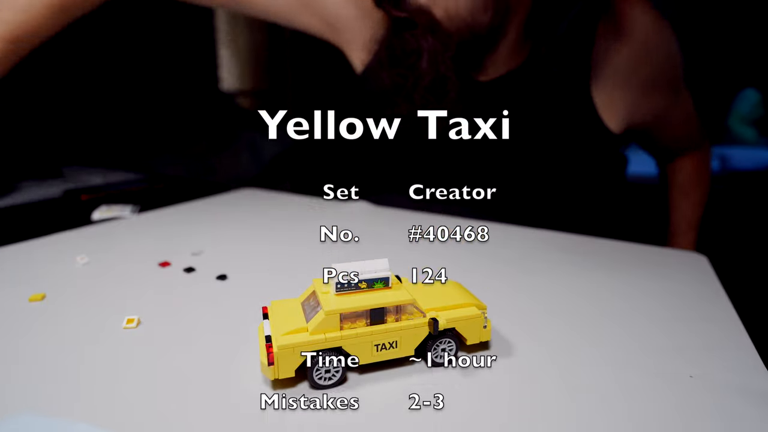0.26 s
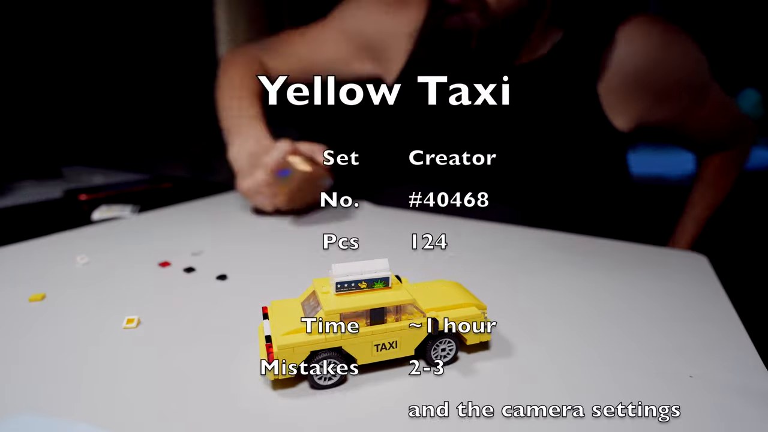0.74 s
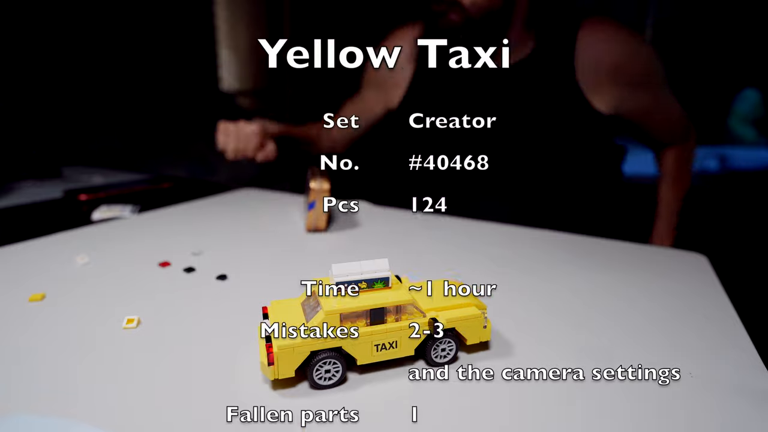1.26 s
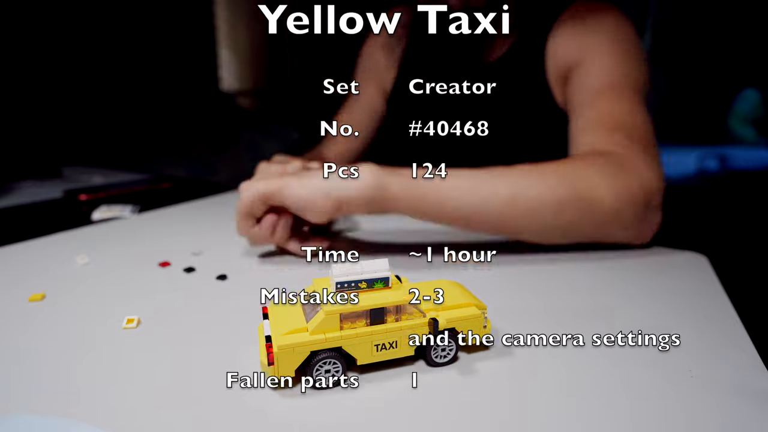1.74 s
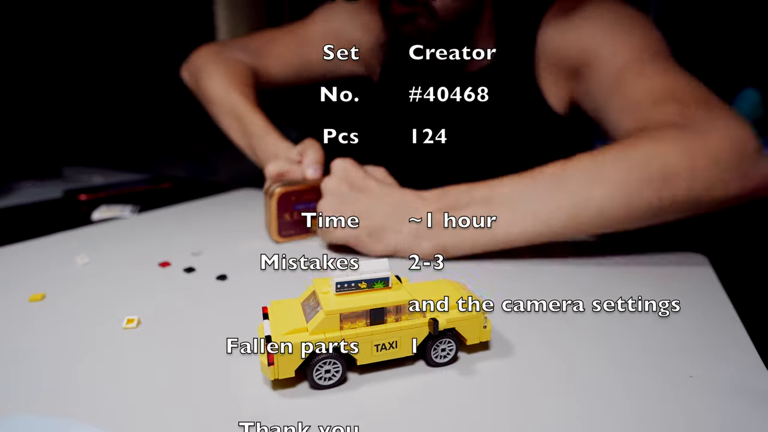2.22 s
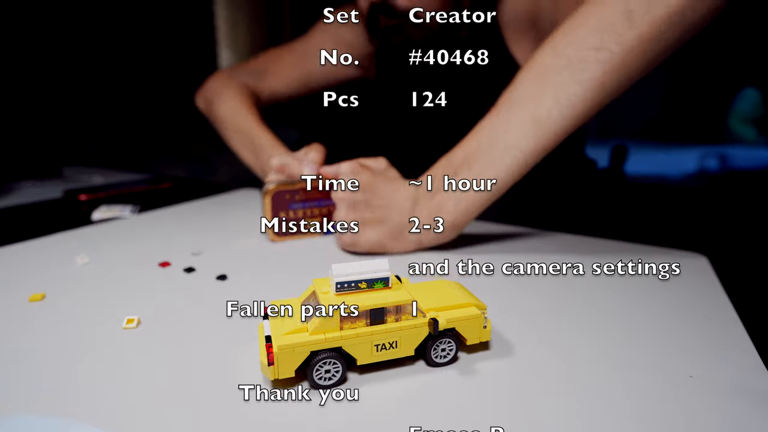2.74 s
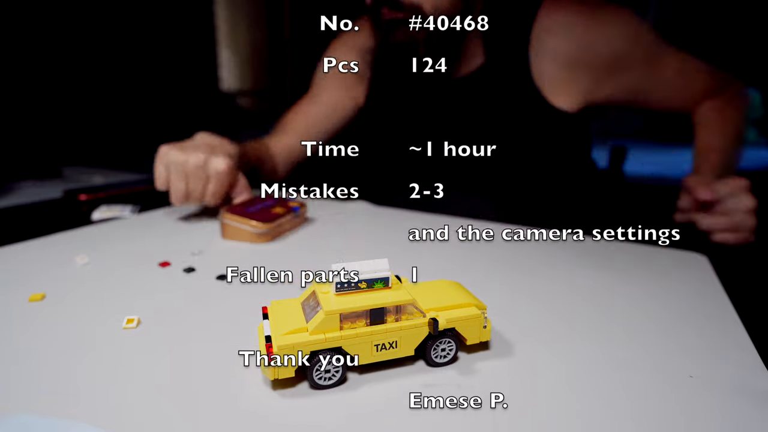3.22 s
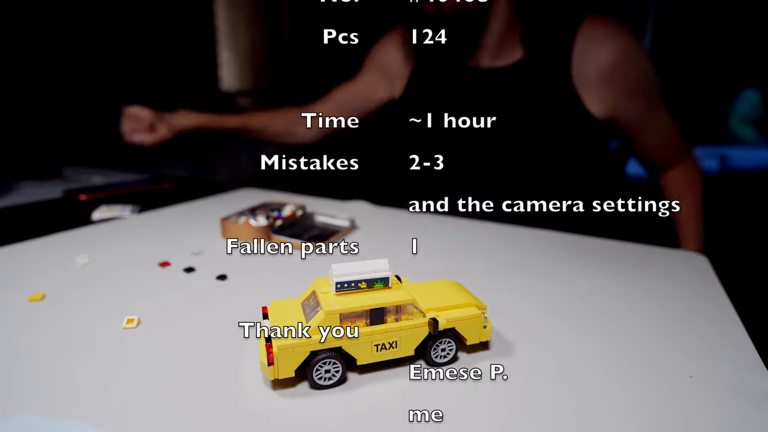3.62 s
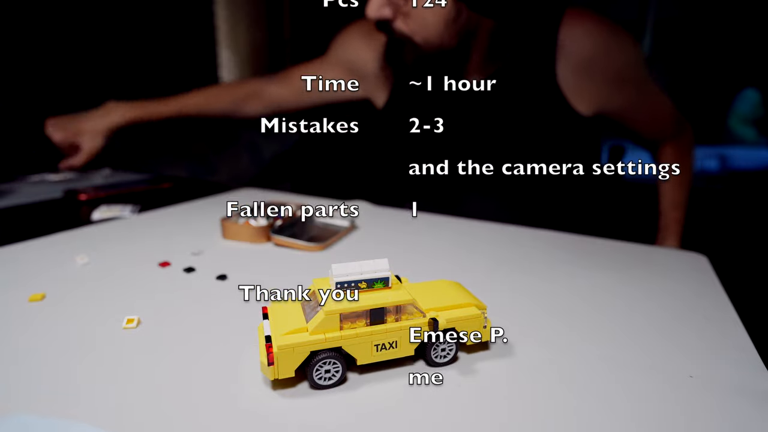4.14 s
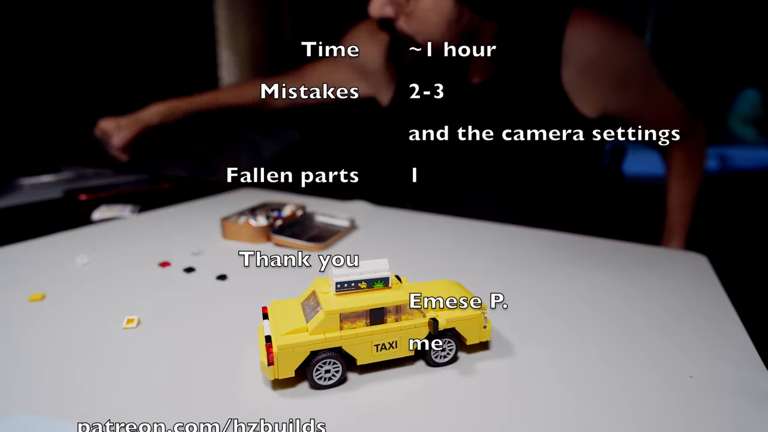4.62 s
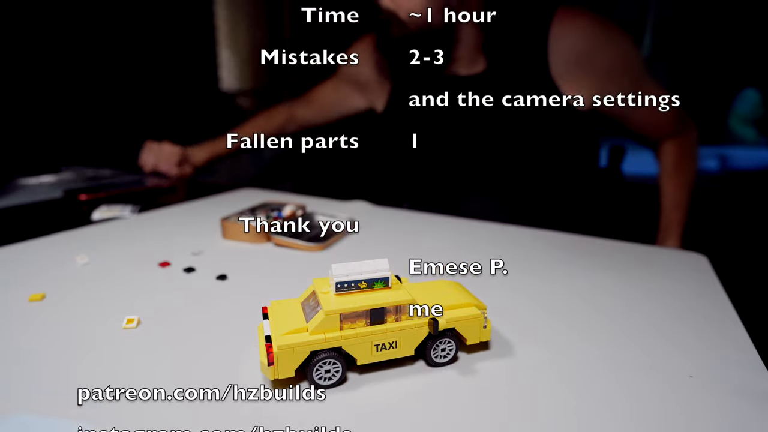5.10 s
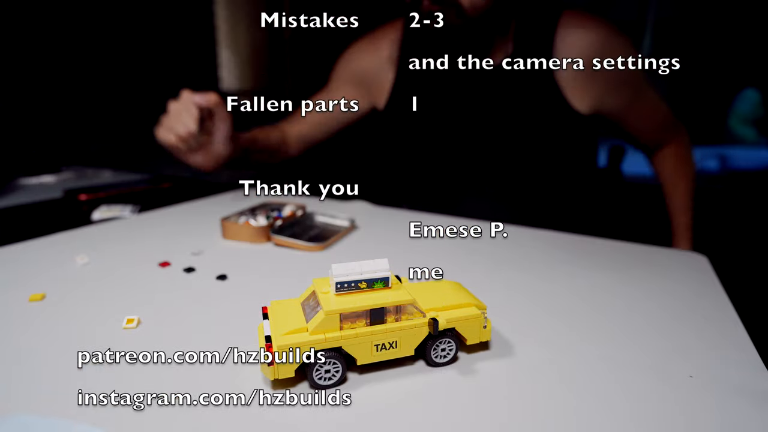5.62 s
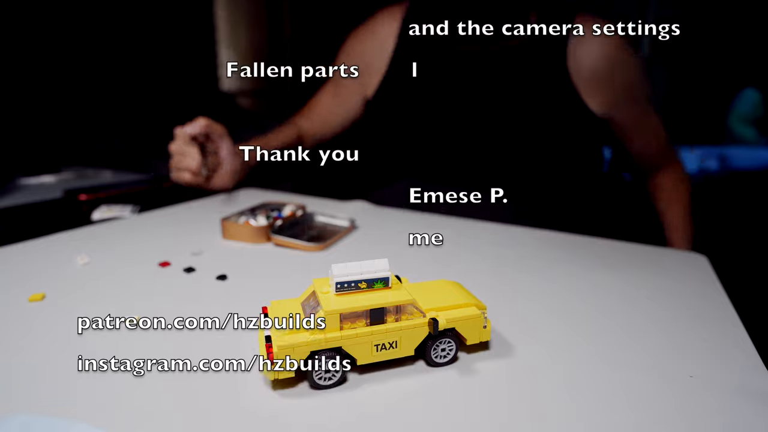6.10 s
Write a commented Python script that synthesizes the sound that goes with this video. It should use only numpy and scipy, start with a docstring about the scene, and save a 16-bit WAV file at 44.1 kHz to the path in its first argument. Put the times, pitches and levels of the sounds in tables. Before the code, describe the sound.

A small case filled with loose plastic bits drags raspingly over a table, clicking and rattling, then is stood on edge. After a quieter stretch of fumbling it snaps open sharply and clatters flat. Steel tools then knock dully and clink on the desk, with tweezers picked up last. Sleeves and arms rustle faintly, and the table shudders low after shoves. Close microphone in a quiet, dry room.

```python
"""A rasping drag over a table comes first: a small hinged case full of bits slides, is stood on edge, snapped open
and laid flat with a clatter. Steel tools and tweezers clink and knock on a desk beside it, and arms rustle by.
Friction is shaped noise under stroke envelopes; blows are noise bursts and pushes through resonances, some with
ringing sines. The table shudders at a low pitch after each shove, in a quiet, dry room."""
import sys
import numpy as np
from scipy import signal
from scipy.fft import rfft, irfft, next_fast_len
from scipy.io import wavfile
from scipy.ndimage import uniform_filter1d, map_coordinates

SR = 44100
rng = np.random.default_rng(int(sys.argv[2]) if len(sys.argv) > 2 else 0)


def materialize(psi):
    """Save the field psi as 16-bit PCM at rate SR to the path in sys.argv[1].

    A 1-D psi becomes a single channel; in a 2-D psi each row is a channel.
    """
    bounded = np.clip(np.atleast_2d(psi).T, -1, 1)
    quanta = np.round(bounded * 32767).astype(np.int16)
    wavfile.write(sys.argv[1], SR, quanta)


N = 280463

LEAD = SR // 14  # samples kept ahead of a contact
T = (np.arange(SR // 3) - LEAD) / SR  # time around a contact (s)
AFTER = np.maximum(T, 0)  # time since the contact (s)
TIME = np.arange(N) / SR  # time in the scene (s)

# tone of the loose bits inside the case: pitch_hz [Hz], gain_db [dB]
CONTENTS = [(50, -7), (130, -6.5), (280, 4.5), (520, -3), (700, 3), (1300, 1), (1900, -0.5), (3500, 0),
            (5000, -4), (8500, -12), (10500, -22), (13000, -21.5), (16000, -43)]


def amp(db):
    """Decibels to gain."""
    return 10 ** (np.asarray(db) / 20)


def unit(x):
    """Scale to rms 1."""
    return x / np.sqrt(np.mean(x ** 2) + 1e-20)


def crest(x, size=220):
    """Scale so that the loudest stretch of the given size in samples (5 ms by default) has rms 1."""
    return x / np.sqrt(uniform_filter1d(x ** 2, size).max() + 1e-20)


def fade(t, t60):
    """Exponential decay by 60 dB in t60 seconds."""
    return np.exp(-np.log(1000) * t / np.maximum(t60, 1e-4))


def swell(start, length, rise, t60):
    """Attack, hold and release over the whole scene; rise and t60 are the seconds per 60 dB."""
    attack = fade(np.maximum(start - TIME, 0), rise)
    release = fade(np.maximum(TIME - start - length, 0), t60)
    return attack * release


def along(points, hz):
    """Read (Hz, value) points on a log frequency axis."""
    f, v = np.transpose(points)
    return np.interp(np.log(hz + 1), np.log(f + 1), v)


def wobble(rate):
    """A random curve of straight segments, rate knots a second."""
    knots = rng.standard_normal(int(N * rate / SR) + 4)
    return map_coordinates(knots, [np.arange(N) * rate / SR], order=1)


def colour(x, gain):
    """Minimum-phase filter with the given gain over frequency, so nothing sounds ahead of its cause."""
    m = 2 * next_fast_len(len(x) // 2 + 4096)
    log_gain = np.log(np.maximum(gain(np.fft.rfftfreq(m, 1 / SR)), 1e-6))
    cepstrum = irfft(log_gain)
    # folding the cepstrum forward makes the filter causal
    cepstrum[1:m // 2] *= 2
    cepstrum[m // 2 + 1:] = 0
    return irfft(rfft(x, m) * np.exp(rfft(cepstrum)))[:len(x)]


def shaped(x, spectrum):
    """Filter x along (Hz, dB) points, at rms 1."""
    return unit(colour(x, lambda hz: amp(along(spectrum, hz))))


def peak(hz, centre, width):
    """Gain of one resonance."""
    return hz * width / np.hypot(centre ** 2 - hz ** 2, hz * width)


def grains(n, spread_db):
    """Countless tiny contacts of very unequal size."""
    size, sign = rng.standard_normal((2, n))
    return unit(sign * amp(spread_db * np.clip(size, -2, 2)))


def patchy(x, depth_db):
    """Resonances come and go as the point of contact moves: a smoothed random gain over pitch and time."""
    z = signal.stft(x, nperseg=1024)[2]
    field = uniform_filter1d(rng.standard_normal(z.shape), size=5, axis=0)
    field = uniform_filter1d(field, size=9, axis=1)
    return unit(signal.istft(z * amp(depth_db * unit(field)), nperseg=1024)[1][:N])


def chatter(rise, t60, spread_db):
    """Tiny contacts that crowd together towards a blow and die away after it."""
    return grains(len(T), spread_db) * fade(AFTER - T, rise) * fade(AFTER, t60)


def ring(modes, damping, scatter_db, blur_hz):
    """Free ringing at new mode strengths for each blow; loose contact makes the phases drift."""
    hz, db, t60 = np.transpose(modes)[:, :, None]
    strength, phase = rng.standard_normal((2, len(modes), 1))
    steps = rng.standard_normal((len(modes), len(T)))
    drift = np.cumsum(steps, axis=1) * np.sqrt(2 * np.pi * blur_hz / SR)
    level = amp(db + scatter_db * strength) * fade(AFTER * damping, t60)
    partials = level * np.sin(2 * np.pi * (hz * T + phase) + drift)
    return crest(partials.sum(axis=0) * (T >= 0))


def add(track, s, sound):
    """Mix in a sound whose contact falls at s seconds."""
    start = round(s * SR) - LEAD
    part = sound[max(-start, 0):N - start]
    track[max(start, 0):][:len(part)] += part


def background():
    """Still room air and the faint rustle of arms, which swells and fades with each sweep."""
    # room air spectrum: pitch_hz [Hz], relative_level_db [dB per Hz]
    air_spectrum = [(18, -20.5), (30, 5), (81, 0), (117, 2.5), (264, 0), (755, -11.5), (955, -26),
                    (1750, -16), (2800, -21.5), (4980, -24), (7780, -26), (14600, -33), (15800, -38.5)]
    # sweeps of the arms: middle_s [s], length_s [s, between the points 4.3 dB down], rustle_db [dB]
    arm_sweeps = [(0.147, 0.23, -58.5), (1.26, 0.27, -56), (1.52, 0.22, -57.5), (1.985, 0.51, -52.5),
                  (2.596, .4, -59.5), (3.4, 0.95, -59.5), (4.537, 0.21, -59), (5.712, 1, -62),
                  (6.08, 0.47, -61)]
    air = amp(-59.5) * shaped(grains(N, spread_db=7.5), air_spectrum)
    cloth = shaped(grains(N, spread_db=7), [
        (100, -16), (400, 0), (1500, -3.5), (4000, -10.5), (8500, -17.5), (10500, -24.5), (16000, -31.5)])
    power = sum(amp(db) ** 2 * np.exp(-(2 * (TIME - s) / length) ** 2) for s, length, db in arm_sweeps)
    return air + np.sqrt(power) * amp(0.5 * wobble(13)) * cloth


def sway(sway_hz=27.0, rumble_db=-6):
    """After each shove the table rocks on its legs: a deep drifting sine over rumble, dying away."""
    # shoves that set the table rocking: start_s [s], sway_db [dB]
    shoves = [(.03, -43.5), (.3, -47), (.87, -36), (1.81, -39.5), (2.035, -32), (2.27, -42), (2.72, -47),
              (2.89, -34), (3.05, -38), (3.44, -41), (3.86, -33.5), (4.23, -39.5), (4.44, -35.5),
              (4.79, -29), (5.11, -36), (5.34, -49), (5.79, -42), (6.13, -55)]
    rise_s, t60_s = 0.15, 0.47  # time the sway takes to gain and to lose 60 dB
    swing = unit(np.sin(2 * np.pi * sway_hz * TIME + 0.96 * wobble(10)))
    rumble = shaped(grains(N, spread_db=5.0), [
        (8, -19), (25, -0.5), (45, -3), (70, -22.5), (110, -12.5), (200, -36), (600, -92)])
    rocking = np.sqrt(sum((amp(db) * swell(s, 0, rise_s, t60_s)) ** 2 for s, db in shoves))
    return rocking * unit(swing + amp(rumble_db) * rumble)


def ticks():
    """Small bits tick against each other: each light touch is answered by one short resonance."""
    # ticks: contact_s [s], level_db [dB, loudest 5 ms], pitch_hz [Hz]
    touches = [(.664, -35.5, 1820), (1.139, -49, 755), (2.512, -26, 710), (2.861, -45.5, 7900),
               (3.147, -47, 1080), (3.708, -48.5, 1860), (3.801, -26.5, 3440), (4.065, -43.5, 1870),
               (4.071, -54, 4000), (5.337, -52, 2160), (5.411, -45, 4960)]
    out = np.zeros(N)
    for s, db, pitch_hz in touches:
        touch = chatter(rise=0.022, t60=0.017, spread_db=1.5)
        tick = colour(touch, lambda hz: peak(hz, pitch_hz, 0.17 * pitch_hz) ** 2)
        add(out, s, amp(db) * crest(tick))
    return out


def steel(touches, modes, grip_hz, scratch_db, damping):
    """Steel chatters against the desk, its modes widened by the fingers' damping, and rings on."""
    out = np.zeros(N)

    def held(hz):
        widths = [grip_hz * (centre / 5000) ** 0.16 for centre, _, _ in modes]
        resonances = sum(amp(level) * peak(hz, centre, width) ** 2
                         for (centre, level, _), width in zip(modes, widths))
        return resonances + amp(scratch_db)

    for s, db, rise, t60, ring_db, treble_db in touches:
        clink = crest(colour(chatter(rise, t60, spread_db=15.5), held))
        clink += amp(ring_db) * ring(modes, damping=damping, scatter_db=4.5, blur_hz=39.3)
        tilted = colour(clink, lambda hz: amp(along([(1500, 0.0093), (12000, treble_db)], hz)))
        add(out, s, amp(db) * crest(tilted))
    return out


def tweezers():
    """Tweezers are picked up: thin steel chatter and ring with high modes."""
    # touches: contact_s [s], level_db [dB, loudest 5 ms], rise_s [s per 60 dB], chatter_t60_s [s],
    # ring_db [dB re chatter], treble_db [dB at 12 kHz]
    touches = [(5.338, -35.5, 0.033, 0.037, -7, -12.5), (5.410, -52, .004, 0.016, -14, 0),
               (5.547, -54, 0.041, 0.13, -15, -7)]
    # modes of the tweezers: pitch_hz [Hz], mean_level_db [dB], free_t60_s [s, before damping divides it]
    modes = [(1190, -4, 0.19), (2325, -10, .12), (5050, -1.5, 0.16), (6360, -7, 0.12), (7840, 5, 0.15),
             (8500, -3, 0.15), (9600, -21, 0.1), (11100, -7, 0.07), (11600, 2, 0.22), (13700, -1, .08),
             (15000, 2, .035)]
    return steel(touches, modes, grip_hz=330, scratch_db=-15, damping=1.6)


def tools():
    """Steel tools touch as they are put down: heavier steel chatters and rings from lower modes up."""
    # touches: contact_s [s], level_db [dB, loudest 5 ms], rise_s [s per 60 dB], chatter_t60_s [s],
    # ring_db [dB re chatter], treble_db [dB at 12 kHz]
    touches = [(3.802, -30, 0.024, 0.062, -29, 7), (3.909, -33, 0.037, 0.03, -2, 0),
               (3.970, -40.5, 0.12, 0.071, -32, -7.5), (4.125, -42, 0.053, 0.1, 8, -26),
               (4.186, -28.5, 0.0015, 0.003, -19, -23.5), (4.405, -57, 0.033, 0.15, 7, -15)]
    # modes of the tools: pitch_hz [Hz], mean_level_db [dB], free_t60_s [s, before damping divides it]
    modes = [(780, 6, 0.061), (1440, 3.5, 0.14), (2750, 1.5, 0.24), (3370, 1, 0.055), (4110, -1.5, .2),
             (4680, 0.5, .2), (5100, -4.5, 0.35), (5300, -7, 0.2), (5980, -9, 0.38), (6420, -2, 0.17),
             (7100, 1.5, 0.076), (7860, -2, 0.11), (8530, 1.5, 0.091), (9700, -9, 0.11),
             (10400, -20, 0.083), (12100, -22, .12)]
    return steel(touches, modes, grip_hz=210, scratch_db=-18, damping=1.13)


def knocks(approach_cycles=12):
    """Hands, case and tools bump the desk; a softer contact builds up longer and wakes fewer resonances."""
    # dull knocks: contact_s [s], level_db [dB, loudest 5 ms], softness_hz [Hz], chatter_t60_s [s], thump_db [dB]
    blows = [(.195, -35, 690, .13, -20), (.219, -31.5, 720, 0.05, -22), (.796, -38, 298, .13, -2),
             (.828, -21.5, 1300, 0.02, 7), (.842, -32.5, 248, 0.1, 4), (.983, -46, 266, 0.64, 5),
             (1.782, -35, 347, 0.033, -3.5), (1.995, -37.5, 253, 0.11, -22), (2.051, -40, 247, 0.063, 0),
             (2.252, -40, 210, 0.073, -11), (3.796, -23.5, 714, 0.093, -2), (3.803, -25, 760, 0.04, -22),
             (3.827, -23, 950, 0.21, -16), (3.839, -21, 456, 0.094, -29), (3.853, -20.5, 930, .14, -12),
             (4.125, -45.5, 500, 0.38, -3), (4.17, -30, 1470, 0.22, -20), (4.186, -19.5, 1640, 0.16, -27),
             (4.204, -18.5, 844, 0.076, -23), (4.215, -19.5, 1410, 0.1, -8), (4.4, -34, 354, 0.057, -10),
             (4.447, -28, 436, .046, -21), (4.456, -20, 402, 0.062, -30), (4.747, -26, 403, 0.096, -0.5),
             (4.757, -24.5, 373, 0.1, 0), (4.818, -45.5, 684, 0.18, -12), (4.992, -48.5, 257, 0.16, 4),
             (5.079, -36.5, 374, 0.19, 9), (5.149, -39.5, 710, 0.094, -18), (5.203, -33.5, 360, .026, -18),
             (5.337, -32.5, 300, 0.17, 4.5), (5.763, -39.5, 1060, 0.12, -2)]
    # desk resonances: pitch_hz [Hz], width_hz [Hz], level_db [dB]
    desk_modes = [(241, 230, -9), (324.6, 55, -0.5), (430, 160, -1.5), (736, 83, 1.5), (1020, 660, -3.5),
                  (1300, 34, -7), (1524, 31, 0), (1784, 63, 3), (2230, 780, -5)]
    out = np.zeros(N)

    def desk(hz):
        return np.sqrt(sum((amp(level) * peak(hz, centre, width)) ** 2 for centre, width, level in desk_modes))

    def spring(hz, soft_hz):
        # the contact is a spring: it favours its own frequency and muffles all above it
        muffling = 1 / np.hypot(1, (hz / soft_hz) ** 2.83)
        return muffling + 0.47 * peak(hz, soft_hz, 0.14 * soft_hz) ** 2 + amp(-42)

    for s, db, soft_hz, t60, thump_db in blows:
        rise_s = 0.0036 + approach_cycles / soft_hz
        blow = (T == 0) + 0.11 * chatter(rise=rise_s, t60=t60, spread_db=5.5)
        thump = lambda hz: amp(thump_db) * peak(hz, 119, 114) ** 2
        knock = colour(blow, lambda hz: np.hypot(desk(hz), thump(hz)) * spring(hz, soft_hz))
        add(out, s, amp(db) * crest(knock))
    return out


def rattles():
    """Loose bits jump inside the case, a few striking hard; its cavity and the table colour them."""
    # rattles as the case slides, lands or opens: contact_s [s], level_db [dB, loudest 15 ms],
    # rise_s [s per 60 dB], t60_s [s], cavity_hz [Hz], cavity_db [dB], table_db [dB of bass lift]
    jolts = [(.045, -29, 0.99, 0.053, 3370, 2, -17), (.364, -37, 0.11, 0.081, 2880, 19, -3),
             (.830, -24, 0.11, 0.14, 640, 5, 15.5), (2.703, -22, 0.042, 0.19, 1880, 10.5, 10),
             (3.003, -21, 0.041, 0.13, 940, 13.5, 8.5), (3.025, -23.5, 0.062, 0.12, 1020, 2.5, -4),
             (3.411, -19.5, 0.049, 0.15, 2195, 13, 2)]
    out = np.zeros(N)
    for s, db, rise, t60, cavity_hz, cavity_db, table_db in jolts:
        hard = (rng.random(len(T)) < 260 / SR) & (T > 0)  # 260 hard strikes a second on average
        contacts = chatter(rise, t60, spread_db=7) + 6 * hard * fade(AFTER, t60)
        shell = lambda hz: amp(along(CONTENTS, hz) + table_db / (1 + (hz / 400) ** 2))
        cavity = lambda hz: 1 + amp(cavity_db) * peak(hz, cavity_hz, 0.27 * cavity_hz) ** 2
        rattle = colour(contacts, lambda hz: shell(hz) * cavity(hz))
        add(out, s, amp(db) * crest(rattle, size=660))
    return out


def clicks(wash_db=0, wash_t60=.13):
    """Case and catch click: a sharp push and brief buzz, then the shell rings in clear modes and a dense wash."""
    # clicks: contact_s [s], push_db [dB, loudest 5 ms], treble_lift_db [dB], ring_db [dB re push]
    snaps = [(0.006, -31, 21, -5.5), (0.193, -47, 6, 7), (0.513, -39, 5, -10), (0.5445, -29.5, 6, -12),
             (0.552, -43, 10, -13), (0.578, -26, 10, -5), (0.609, -33, 10, -15), (0.663, -28.5, -13, -18),
             (0.703, -34.5, 11, -22), (0.779, -48, -9, -15), (0.825, -31, 5, -25), (0.936, -31, 11, -9),
             (1.003, -33.5, -2, -24), (1.061, -33, -2, -32), (1.894, -31, -5.5, -30),
             (2.02, -32.5, -7, -8.5), (2.086, -34.5, 3, -31), (2.111, -38, -12, -27),
             (2.5107, -18, -5, -7.5), (2.699, -22, -5, -11), (2.76, -32.5, 12, -17), (2.79, -34, 8, -6),
             (2.921, -39, -4, -12), (2.934, -35.5, -7.5, -1), (3.001, -28, 8, -13), (3.009, -26.5, 13, 1.5),
             (3.021, -23, 5, -3), (3.389, -38, 4, 4.5), (3.407, -31.5, 10, -2)]
    # modes of the case: pitch_hz [Hz], mean_level_db [dB], free_t60_s [s, before damping divides it]
    shell_modes = [(704, -16, 0.075), (1460, -11, 0.38), (1750, -4, 0.44), (1973, 5.5, 0.27),
                   (2290, 12, 0.09), (2470, -10, 0.52), (3210, 3.5, 0.094), (3470, -13, 0.26),
                   (4530, -23.5, 0.19), (4850, -24, 0.063), (5380, -11, 0.27), (7150, -13, 0.25),
                   (7800, -31.5, 0.088), (9030, -8.5, 0.17)]
    # tone of the push: pitch_hz [Hz], gain_db [dB]
    snap_tone = [(100, -36), (450, -8), (720, 6), (1050, -4.5), (1900, -2.5), (2700, -9.5), (3400, -5),
                 (4500, -11), (8000, -14), (12000, -26), (16000, -32.5)]
    out = np.zeros(N)
    for s, db, treble_db, ring_db in snaps:
        push = (T == 0) + 0.24 * chatter(rise=0.0002, t60=0.035, spread_db=8.5)
        # a harder contact is brighter
        hardness = lambda hz: amp(along(snap_tone, hz) + treble_db * hz ** 2 / (hz ** 2 + 4000 ** 2))
        snap = crest(colour(push, hardness))
        dense = chatter(rise=0.0002, t60=wash_t60, spread_db=2)
        wash = crest(colour(dense, lambda hz: amp(along(CONTENTS, hz))))
        clear = ring(shell_modes, damping=1.5, scatter_db=2.0, blur_hz=65)
        shell = crest(clear + amp(wash_db) * wash)
        add(out, s, amp(db) * (snap + amp(ring_db) * shell))
    return out


def stroke_levels():
    """Rasp, hiss and drone in dB: each stroke takes hold, presses harder or eases off, and stops."""
    # strokes of case and hands over the table: start_s [s], length_s [s], first_db and last_db [dB of friction],
    # hiss_db [dB re friction], drone_db [dB re friction, in the table top]
    strokes = [(0.0, 0.066, -32.5, -28.5, -14.5, -10.5), (0.194, 0.073, -37, -43.5, -28.5, -1.5),
               (0.325, 0.06, -33.5, -48, -17, -24), (0.398, 0.051, -38.5, -40.5, -21.5, -3.5),
               (0.479, 0.064, -44, -41, -13.5, -22), (0.55, 0.079, -30, -34, -6.5, -34),
               (0.65, 0.082, -42, -45, -12.5, -24), (0.824, 0.05, -29.5, -39, -9, -18),
               (0.904, 0.036, -40.5, -33.5, -12.5, -15), (0.972, 0.19, -50, -59, -11.5, 2),
               (1.513, 0.017, -54, -55.5, -4, -7), (1.61, 0.1, -50.5, -51.5, -12.5, -4),
               (1.823, .018, -38.5, -45, -11, -3), (1.869, 0.033, -47, -40.5, -7.5, -3),
               (1.953, 0.012, -41, -49, -15, -6), (1.994, 0.12, -48, -56.5, -7, 4.5),
               (2.168, 0.038, -43, -46, -11, -4), (2.293, 0.017, -46, -53.5, -16.5, -1.5),
               (2.345, .02, -59, -62, -5, -3), (2.419, 0.082, -47.5, -57, -8, 1.5),
               (2.74, 0.16, -49.5, -45, -10, -3), (2.924, 0.014, -36, -36, -11.5, -4),
               (2.96, 0.037, -46, -42, -12, -2.5), (3.27, .02, -47.5, -47, -15, -4),
               (3.327, .02, -48, -49.5, -8, -7), (3.53, 0.19, -63.5, -60.5, 0, -4),
               (4.756, 0.012, -47, -48.5, -23.5, -5), (4.812, 0.013, -43.5, -46, -27.5, 0.5),
               (5.082, .02, -52, -60, -22.5, 10), (5.145, 0.013, -48, -44.5, -30, -12),
               (5.765, 0.082, -46, -48.5, -10.5, -9), (5.935, 0.16, -56.5, -54.5, -8.5, -4),
               (6.088, 0.058, -50, -56.5, -2, -8.5), (6.174, 0.066, -58.5, -53, -7, -29)]
    rise_s, stop_s = .06, 0.1  # time a stroke takes to gain and to lose 60 dB
    power = np.full((3, N), 1e-12)
    for start, length, first_db, last_db, hiss_db, drone_db in strokes:
        pressure = amp(np.interp(TIME, [start, start + length], [first_db, last_db]))
        layers = amp([[0], [hiss_db], [drone_db]])
        power += (layers * pressure * swell(start, length, rise_s, stop_s)) ** 2
    return 10 * np.log10(power)


def sliding():
    """Surface grain catches under each stroke: a rasp, a hiss and a drone in the table top."""
    # spectra of the three layers: pitch_hz [Hz], relative_level_db [dB per Hz]
    rasp_spectrum = [(210, -26), (350, -10.5), (543, -2.5), (627, 1), (996, -1), (1110, -3.5), (1580, -3.5),
                     (1810, -2), (2210, -4), (2870, -8.5), (3160, -6.5), (5020, -16), (6000, -16.5),
                     (7800, -45.5), (13200, -120)]
    hiss_spectrum = [(3000, -15), (5000, 1.5), (8700, -1.5), (10000, -9.5), (12500, -12), (16000, -17)]
    drone_spectrum = [(50, -26), (120, -1.5), (200, 2.5), (320, 0), (450, -7), (700, -46)]
    rasp_db, hiss_db, drone_db = stroke_levels()
    # firm strokes stick and slip, light ones glide
    firmness = np.interp(rasp_db, [-54, -34], [.6, 1.1])
    grip = unit(amp(firmness * (3.14 * wobble(110) + 0.56 * wobble(700))))
    bare = patchy(shaped(grains(N, spread_db=8.5), rasp_spectrum), depth_db=2.5)
    # soft skin makes little hiss and loses the top of the rasp too
    low_pass = signal.butter(2, 1500, fs=SR, output="sos")
    skin = patchy(shaped(grains(N, spread_db=2.5), rasp_spectrum), depth_db=6.5)
    muffled = unit(signal.sosfilt(low_pass, skin))
    soft = np.clip(np.interp(hiss_db - rasp_db, [-29, -16], [.9, 0]), 0, 1)
    rasp = amp(rasp_db) * (np.sqrt(1 - soft) * bare + np.sqrt(soft) * muffled)
    hiss = amp(hiss_db) * patchy(shaped(grains(N, spread_db=0.5), hiss_spectrum), depth_db=2.5)
    drone = amp(drone_db) * patchy(shaped(grains(N, spread_db=4.0), drone_spectrum), depth_db=5.5)
    return grip * (rasp + hiss) + drone


def room(x):
    """A short diffuse answer from the walls, duller as it dies."""
    # reverberation of the room: pitch_hz [Hz], t60_s [s]
    decay = [(100, 0.28), (1000, 0.27), (4000, 0.17), (14000, 0.056)]
    hz, t, z = signal.stft(rng.standard_normal(SR // 2), SR, nperseg=256)
    tail = signal.istft(z * fade(t, along(decay, hz)[:, None]), SR, nperseg=256)[1]
    delayed = np.pad(tail, (SR // 200, 0))  # the walls answer 5 ms late
    return signal.fftconvolve(x, delayed / np.linalg.norm(tail))[:N]


def scene():
    """Everything on the table, heard from close by; the dull knocks send least into the room."""
    bright = sliding() + clicks() + rattles() + ticks() + tools() + tweezers()
    dull = knocks()
    walls = room(amp(-16.5) * bright + amp(-25.0) * dull)
    return (bright + dull + walls + sway() + background())[None]


def record(dry):
    """Round off the highest peaks smoothly, then low-pass steeply."""
    ceiling, top_hz = .48, 15950  # full-scale amplitude, Hz
    rounded = dry / (1 + (dry / ceiling) ** 4) ** (1 / 4)
    low_pass = signal.firwin(301, top_hz, fs=SR, window="blackman")
    return signal.fftconvolve(rounded, low_pass[None], mode="same")


dry = scene()
out = record(dry)
materialize(out)
```